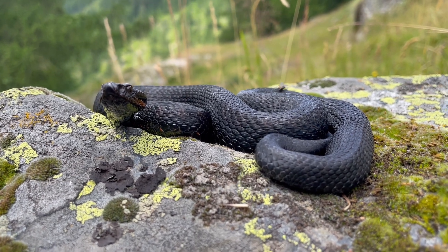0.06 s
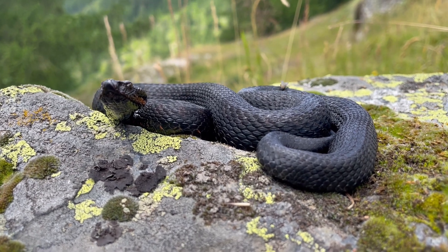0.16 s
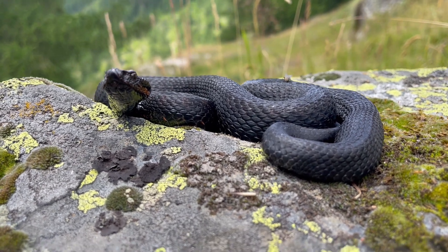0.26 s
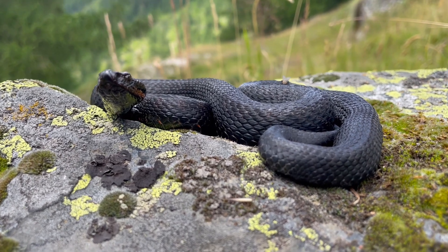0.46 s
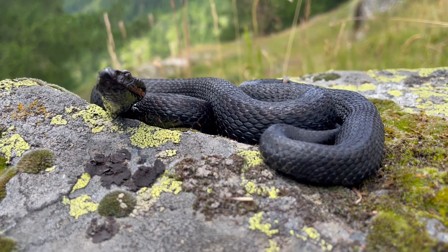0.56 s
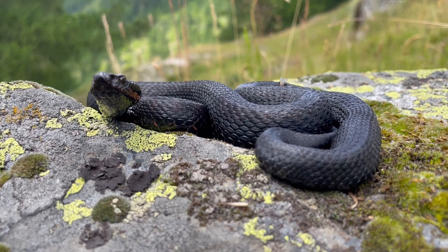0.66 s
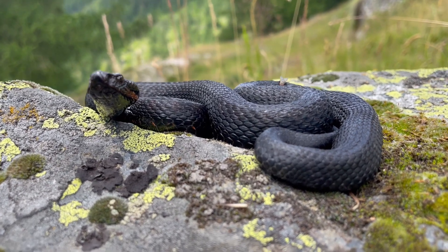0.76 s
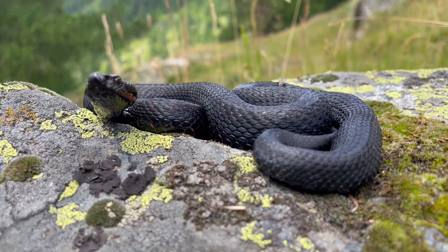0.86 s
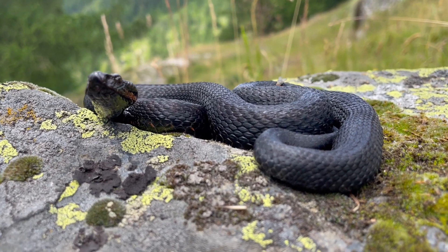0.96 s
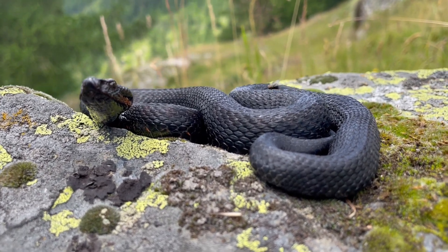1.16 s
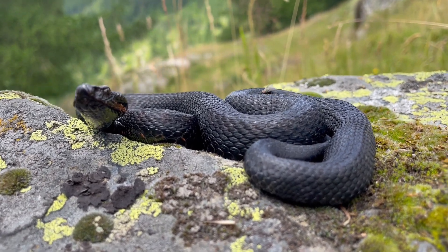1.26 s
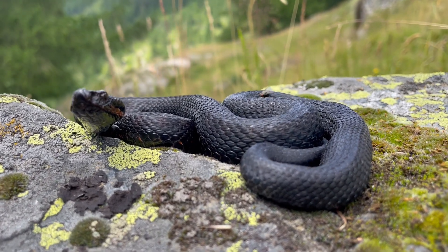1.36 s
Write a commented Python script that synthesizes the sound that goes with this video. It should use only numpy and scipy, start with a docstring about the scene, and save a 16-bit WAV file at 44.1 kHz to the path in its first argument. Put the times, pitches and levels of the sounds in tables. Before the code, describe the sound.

A snake's long, close hiss is the main sound. First, handling knocks bump the microphone, one at the start and the loudest at about 0.2 seconds. The hiss begins near 0.3 seconds and holds steady, bright and breathy, until the end at about 1.4 seconds. Softer bumps, light wind rumble and quiet hillside air lie underneath, with two very faint bird-like chirps around 0.6 and 0.8 seconds.

```python
"""A coiled snake gives one long, steady hiss from a mountain rock, close to a hand-held camera.
Its breath makes a bright jet of air over a few resonances of the throat. Knocks, faint ticks and
the rub of the hand reach the two microphones through the camera body, and light wind rumbles on
them. Far off lie the steady air of the hillside and two faint, bird-like chirps."""
import sys
import numpy as np
from scipy import signal
from scipy.fft import rfft, irfft
from scipy.io import wavfile
from scipy.ndimage import uniform_filter1d

SR = 44100
rng = np.random.default_rng(int(sys.argv[2]) if len(sys.argv) > 2 else 0)


def generate_wav(sig):
    """Save sig (samples, or channels by samples) to the path in sys.argv[1] as 16-bit PCM at SR."""
    pcm = np.round(np.clip(np.atleast_2d(sig).T, -1, 1) * 32767).astype(np.int16)
    wavfile.write(sys.argv[1], SR, pcm)


N = 61739
SIZE, HOP = 512, 128  # noise frames, in samples
BINS, FRAME_S = np.fft.rfftfreq(SIZE, 1 / SR), np.arange(N // HOP + 5) * HOP / SR
TIME = np.arange(N) / SR

# Knocks on the camera. Each row: start in seconds, thud peak in dB, thud pitch in Hz,
# tap peak in dB, tap pitch in Hz, ring level in dB, tick peak in dB.
KNOCKS = [(-.008, -37.5, 84, -23, 245, -52.5, -62), (0.065, -44, 90, -61, 250, -63, -58),
          (0.125, -41.5, 114, -39, 430, -55, -44.5), (0.1765, -33, 124, -35.5, 190, -49, -48),
          (0.2092, -26.5, 84.5, -14, 580, -13, -27), (0.2252, -31.5, 78.5, -22, 470, -20.5, -37.5),
          (.242, -45.5, 149, -39, 500, -41.5, -61), (.26, -59, 121, -50, 400, -55, -46),
          (0.658, -27.5, 101.5, -35, 300, -39.5, -37), (0.882, -41, 112, -43.5, 354, -52, -37.5),
          (.94, -43, 121, -39.5, 510, -54, -52), (1.083, -36.5, 111, -44, 608, -59, -37),
          (1.121, -36, 111, -45, 614, -66, -41.5), (1.1534, -45, 103, -35, 422, -36.5, -39),
          (1.231, -36, 94, -43.5, 554, -58, -47), (1.388, -53, 89.7, -45, 456, -49.5, -44)]
# Hollow ring of the camera body. Each row: pitch in Hz, relative level in dB, seconds to its peak.
BODY_MODES = [(772, 0, 0.005), (481, -19, 0.0066)]
# Path through the body to the microphones. Each row: frequency in Hz, lead of the left in radians.
BODY_PHASE = [(20, -3), (70, 0.77), (180, 0), (350, 0.4), (750, -1.43), (1400, 0.3), (2400, 1), (5500, 0.5),
              (10000, -5), (15000, -9.4)]
# Colours of a contact tick, wind on the microphones, the rubbing hand, distant air and the snake's jet.
# Each row: frequency in Hz, relative level in dB.
TICK_COLOUR = [(300, 2), (1200, -7.5), (2000, 5), (2700, -0.5), (3300, -5.5), (4800, -8), (7000, -15),
               (15000, -24.5)]
WIND_COLOUR = [(20, -45), (40, -6), (65, 6), (120, -1.5), (200, -16), (400, -19), (700, -16), (1500, -45),
               (4000, -44)]
RUB_COLOUR = [(60, -29), (140, 2), (220, -0.5), (400, -5), (700, -14.5), (1500, -29.5), (4000, -35)]
AIR_COLOUR = [(100, 1), (700, 7), (1500, 7.5), (3000, -4), (5000, -9), (8000, -21.5), (15000, -21)]
JET_COLOUR = [(2500, -13), (3100, -11), (4700, -8), (5500, -14), (6000, -5.5), (6600, .8), (7400, .8),
              (8000, -1), (9100, -3), (10600, 1.3), (11700, -.7), (12600, -4), (13600, -1.3), (14700, 4.5),
              (15700, -1.5)]
# Strength of the wind and of the rubbing. Each row: time in seconds, level in dB.
WIND_LEVEL = [(0, -57.5), (.2, -43.5), (.39, -51.5), (.5, -55.5), (.62, -55.5), (.72, -54), (.8, -65),
              (1.02, -63), (1.15, -50), (1.4, -63.5)]
RUB_LEVEL = [(0, -54.5), (.16, -51.5), (.28, -57), (.41, -56.5), (.47, -54.5), (.64, -48.5), (.72, -50.5),
             (.79, -63), (1.4, -72.5)]
# The snake's push of air. Each row: time in seconds, gain on the whole hiss in dB.
EFFORT = [(.32, 1), (.42, 0.7), (.6, 0), (.85, -0.5), (1.02, -1.5), (1.2, -0.5), (1.3, 0), (1.4, 1)]
# Throat resonances. Each row: starting centre in Hz, width in Hz, starting level in dB before EFFORT,
# fade in dB per second, left over right in dB.
THROAT_MODES = [(724, 780, -57.5, 8.5, 0.5), (1346, 510, -54.5, 5.5, 11), (2144, 313, -52.5, 2, 10),
                (4130, 1020, -61.5, 1, 0)]
# The resonances shift in proportion as the head moves. Each row: time in seconds, guide pitch in Hz.
THROAT_DRIFT = [(.3, 2184), (.46, 2130), (.65, 2104), (.85, 2105), (1.0, 2074), (1.16, 2050), (1.28, 2080),
                (1.4, 2130)]
# The hiss at the two microphones. Each row: frequency in Hz, lead of the left in radians.
HISS_PHASE = [(300, -.4), (850, -.8), (1150, .2), (1450, -.8), (1950, -.7), (2350, .4), (3000, 0),
              (5800, 0), (7000, -1.5), (8000, -3.1), (9600, -4.5), (11500, -6.2), (12200, -6.5),
              (13000, -7.8), (14700, -9.3), (15700, -9.5)]
# How alike they hear it. Each row: frequency in Hz, likeness from 0 to 1.
HISS_LIKENESS = [(500, .7), (1100, .5), (2100, .88), (2900, .4), (3700, .93), (5400, .75), (7000, .88),
                 (8200, .97), (9300, .84), (11600, .95), (12800, .8), (15000, .97)]
# Far chirps. Each row: start and length in seconds, first and last pitch in Hz, peak in dB.
CHIRPS = [(0.603, 0.05, 6250, 5250, -56.5), (.812, 0.041, 6940, 5650, -59)]


def amp(db):
    return 10 ** (np.asarray(db) / 20)


def unit_rms(x):
    return x / np.sqrt(np.mean(x ** 2) + 1e-20)


def unit_peak(x):
    return x / abs(x).max()


def over_time(points, s):
    return np.interp(s, *np.transpose(points))


def over_hz(points, hz):
    knots_hz, value = np.transpose(points)
    return np.interp(np.log(hz + 1), np.log(knots_hz + 1), value)


def add(mix, start_s, sound):
    at = round(start_s * SR)
    sound = sound[max(-at, 0):]
    part = mix[max(at, 0):][:len(sound)]
    part += sound[:len(part)]


def waver(samples):
    """A smooth random drift of rms 1."""
    drift = uniform_filter1d(rng.standard_normal(N), samples)
    return unit_rms(uniform_filter1d(drift, samples // 2))


def stereo_noise(colour, likeness, phase=0):
    """Coloured noise of rms 1, with a given likeness and phase between the microphones."""
    a, b, c, d = rng.standard_normal((4, len(FRAME_S), len(BINS)))
    left, apart = a + 1j * b, c + 1j * d
    right = (likeness * left + np.sqrt(1 - likeness ** 2) * apart) * np.exp(-1j * phase)
    frames = (np.array([left, right]) * colour).transpose(0, 2, 1)
    return unit_rms(signal.istft(frames, nperseg=SIZE, noverlap=SIZE - HOP)[1][:, :N])


def blow(centre_hz, octaves, late_cycles, top_hz=1213, size=8192):
    """A dull blow around one pitch; its low part arrives last, so it falls."""
    hz = np.fft.rfftfreq(size, 1 / SR) + 1
    band = np.exp(-.5 * (np.log2(hz / centre_hz) / octaves) ** 2) / (1 + (hz / top_hz) ** 10)
    delay = np.exp(-2j * np.pi * late_cycles * np.log(hz))
    return unit_peak(irfft(band * delay))[:size // 2]


def tick(decay_s=0.0011):
    """A tiny scrape of contact: a burst of noise, coloured with the shortest possible ring."""
    burst = rng.standard_normal(SIZE) * np.exp(-np.arange(SIZE) / SR / decay_s)
    db = over_hz(TICK_COLOUR, BINS)
    log_gain = np.log(amp(np.r_[db, db[-2:0:-1]]))
    minimum_phase = np.exp(np.conj(signal.hilbert(log_gain)))[:len(db)]
    return unit_peak(irfft(rfft(burst) * minimum_phase))


def knocks(contact_s=0.00127, swell=3.1):
    """The hand knocks the camera: each time a thud, a dry tap, a short hollow ring and a tick."""
    t, out = np.arange(SR // 20) / SR, np.zeros(N)
    ring = sum(amp(db) * (t / peak_s * np.exp(1 - t / peak_s)) ** swell * np.sin(2 * np.pi * hz * t)
               for hz, db, peak_s in BODY_MODES)
    for start_s, thud_db, thud_hz, tap_db, tap_hz, ring_db, tick_db in KNOCKS:
        add(out, start_s, amp(thud_db) * blow(thud_hz, octaves=0.47, late_cycles=2.0))
        add(out, start_s, amp(tap_db) * blow(tap_hz, octaves=1.0, late_cycles=1.6))
        add(out, start_s + contact_s, amp(ring_db) * ring)
        add(out, start_s + contact_s, amp(tick_db) * tick())
    return out


def rustle(ticks_per_s=81, peak_db=-53, spread_db=1):
    """Handling scatters faint ticks over the camera body."""
    contacts = rng.random(N) < ticks_per_s / SR
    strength = amp(peak_db + spread_db * rng.standard_normal(N))
    return signal.fftconvolve(contacts * strength, tick())[:N]


def rumble(colour, level, likeness=0.97, waver_db=1):
    """Wind or a rubbing hand, right at the microphones: lumpy low noise, nearly the same in both."""
    gain = amp(over_hz(colour, np.fft.rfftfreq(N, 1 / SR)))
    mid, side = irfft(rfft(rng.standard_normal((2, N))) * gain, N)
    pair = unit_rms(np.sqrt(1 + likeness) * mid + np.sqrt(1 - likeness) * side * np.array([[1], [-1]]))
    return pair * amp(over_time(level, TIME) + waver_db * waver(samples=1000))


def camera_body(x):
    """The body carries a sound to both microphones, out of step between left and right."""
    phase = over_hz(BODY_PHASE, np.fft.rfftfreq(2 * N, 1 / SR))
    return irfft(rfft(x, 2 * N) * np.exp(.5j * phase * np.array([[1], [-1]])))[:, :N]


def distant_air(level_db=-61):
    """The far air of the hillside: a steady, wide wash."""
    return amp(level_db) * stereo_noise(amp(over_hz(AIR_COLOUR, BINS)), likeness=0.42)


def hiss(start_s=0.2686, rise_s=0.041, throat_lag_s=0.017, jet_db=-46):
    """Close by, one push of air makes a bright jet, then sounds the throat, whose resonances fade."""
    likeness, phase = over_hz(HISS_LIKENESS, BINS), over_hz(HISS_PHASE, BINS)
    age = TIME - start_s
    opening = np.clip(np.array([age, age - throat_lag_s]) / rise_s, 0, 1)
    jet_on, throat_on = np.sin(np.pi / 2 * opening) ** 2
    low_cut = BINS ** 2 / (BINS ** 2 + JET_COLOUR[0][0] ** 2)
    jet_flutter_db = 0.7 * waver(samples=300)
    jet = stereo_noise(amp(over_hz(JET_COLOUR, BINS)) * low_cut, likeness, phase)
    out = jet_on * amp(jet_db + jet_flutter_db) * jet
    shift = over_time(THROAT_DRIFT, FRAME_S)[:, None] / THROAT_DRIFT[0][1]
    throat_flutter_db = 0.8 * waver(samples=900)
    for hz, width_hz, db, fade_db_per_s, left_db in THROAT_MODES:
        resonance = 1 / (1 + (2 * (BINS - hz * shift) / width_hz) ** 2)
        balance = unit_rms(amp([[left_db], [0]]))
        level = throat_on * amp(db - fade_db_per_s * age + throat_flutter_db)
        out += balance * level * stereo_noise(resonance, likeness, phase)
    return out * amp(over_time(EFFORT, TIME))


def chirps():
    """Two faint falling whistles, like a bird far off."""
    out = np.zeros(N)
    for start_s, length_s, start_hz, end_hz, db in CHIRPS:
        hz = np.geomspace(start_hz, end_hz, int(length_s * SR))
        add(out, start_s, amp(db) * np.hanning(len(hz)) * np.sin(2 * np.pi * np.cumsum(hz) / SR))
    return out


def scene():
    """The snake close in front, the hillside beyond, handling and wind at the camera."""
    snake = hiss()
    hillside = distant_air() + chirps()
    handling = knocks() + rustle()
    wind = rumble(WIND_COLOUR, WIND_LEVEL)
    rubbing = rumble(RUB_COLOUR, RUB_LEVEL)
    return snake + hillside + camera_body(handling + wind + rubbing)


def record(dry, edge_hz=15800):
    """The camera cuts off the highest treble."""
    low_pass = signal.firwin(511, edge_hz, window=("kaiser", 9), fs=SR)
    return signal.oaconvolve(dry, low_pass[None], "same")


dry = scene()
out = record(dry)
generate_wav(out)
```